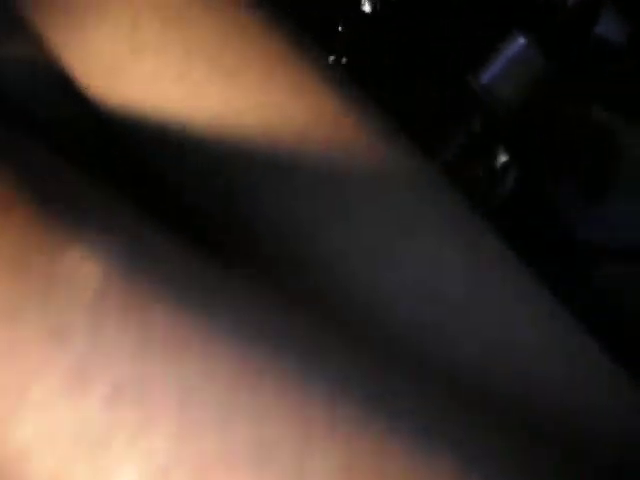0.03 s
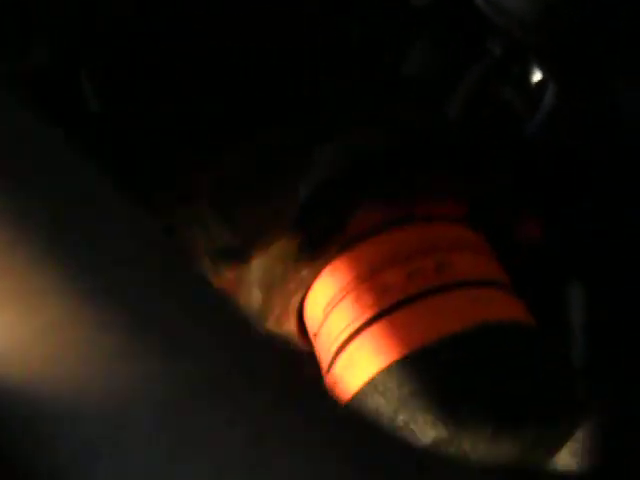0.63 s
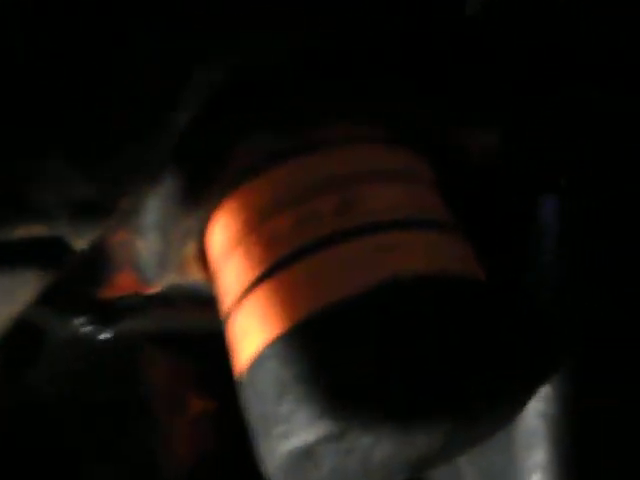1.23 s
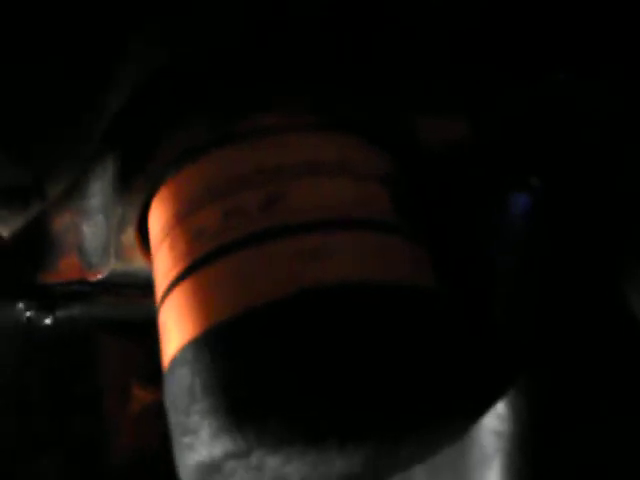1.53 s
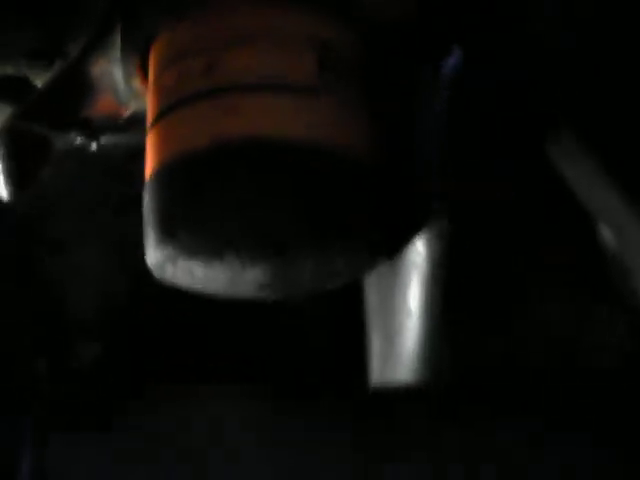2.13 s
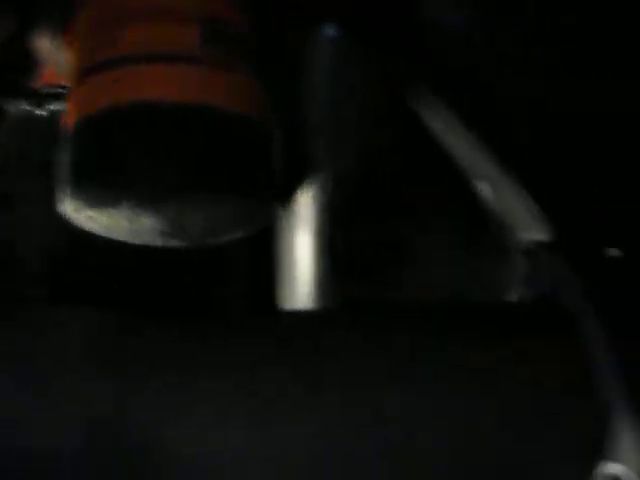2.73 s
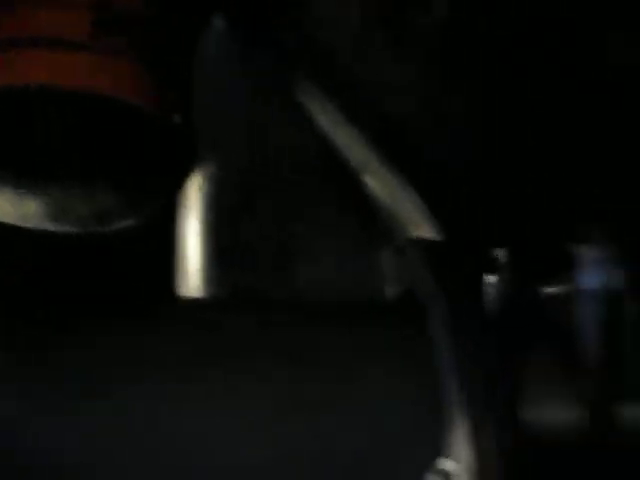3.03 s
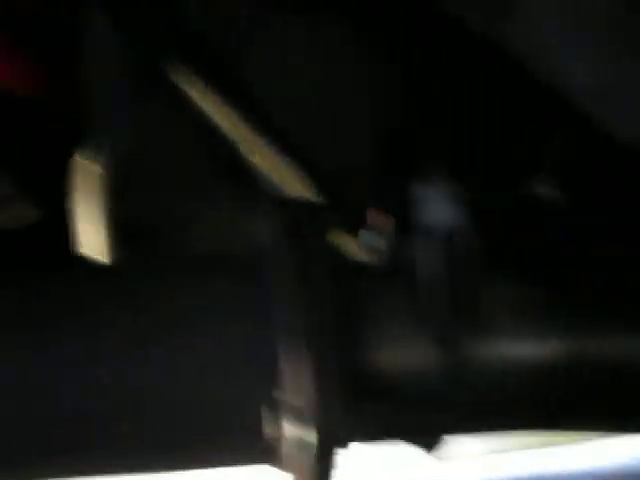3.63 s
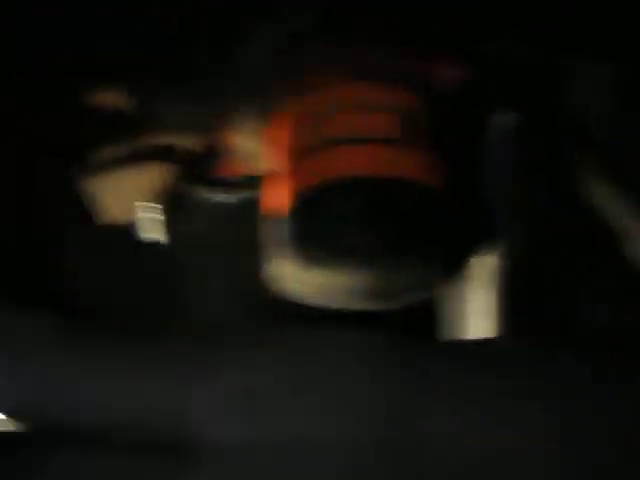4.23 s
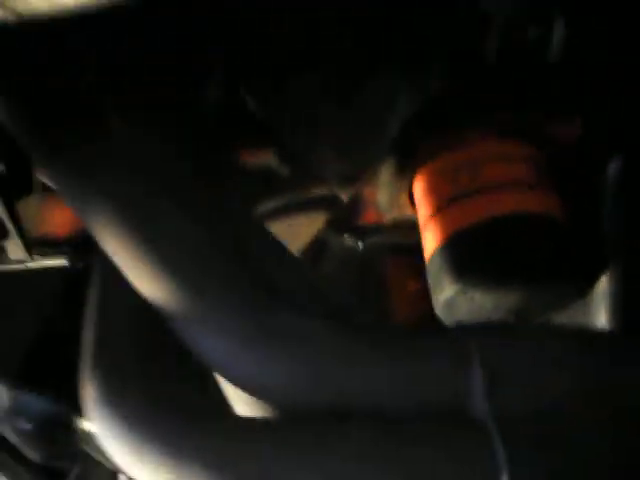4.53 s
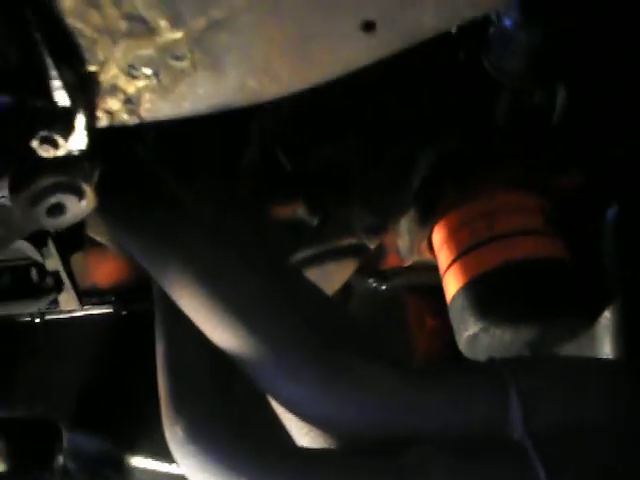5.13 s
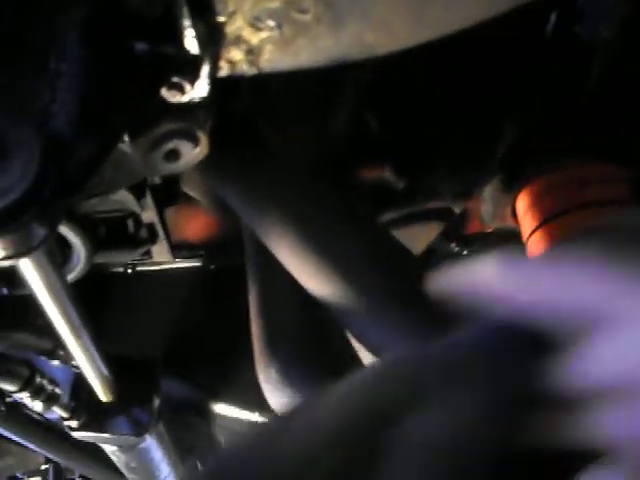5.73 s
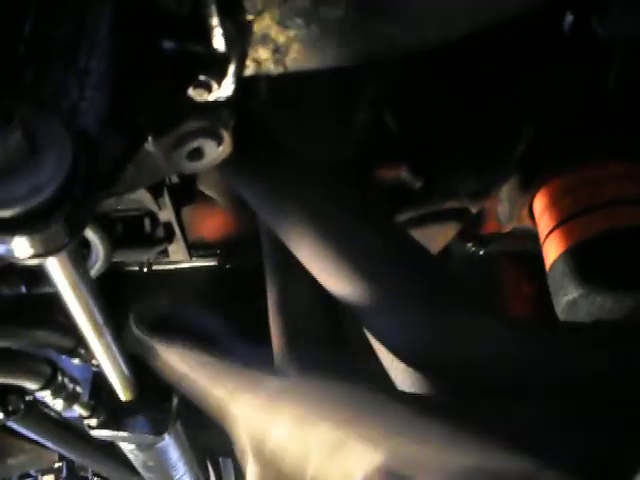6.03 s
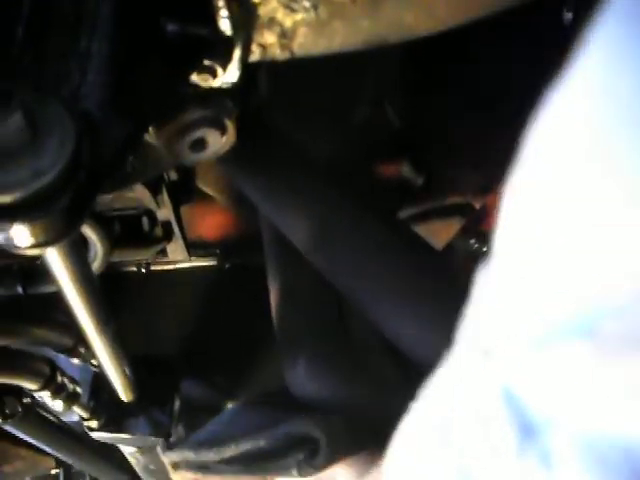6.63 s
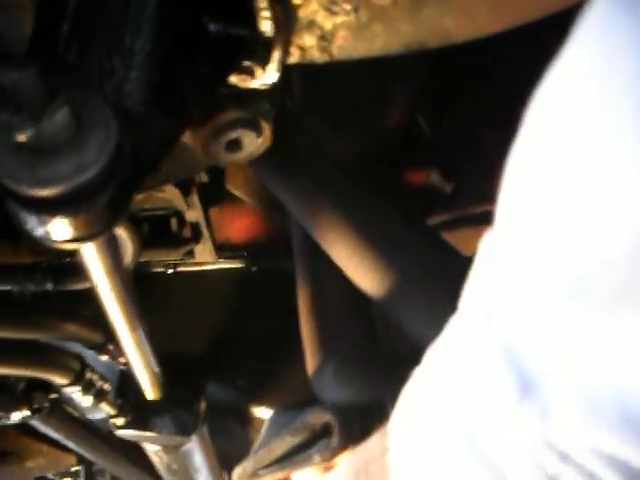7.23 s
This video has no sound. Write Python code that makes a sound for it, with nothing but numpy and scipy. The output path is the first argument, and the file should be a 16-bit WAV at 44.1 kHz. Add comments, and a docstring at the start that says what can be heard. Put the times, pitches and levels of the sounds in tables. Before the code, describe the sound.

An eight-cylinder car engine idles from start to finish, heard close up from just below. Uneven exhaust pulses make a deep, loping throb over the rumble of the block, with the biggest bass beats slightly squashed. On top, a slack valve lifter gives a loud, ringing metallic tick about seven times a second, and the other valves patter softly in between. Belts and fan add a steady rush and hiss, with thin, wavering pulley whines.

The ticking grows louder over the first two seconds and stays strong until about 4 seconds, changing tone a little around 3 seconds as the microphone swings toward a pipe. A faint, brief belt squeak comes at about 4.3 seconds. Between 4 and 5 seconds the microphone pulls back, so the ticking and hiss become softer, while the low throb continues steadily to the end at around 7.4 seconds.

```python
"""A loud, steady tick over the loping throb of an idling eight-cylinder engine, heard from just below it.
Once a cycle a slack valve lifter clacks through the metal block, while the other valves patter softly.
Uneven exhaust pulses make the throb; the block rumbles, and belts, fan and pulleys rush and whine.
The microphone swings from the oil filter to a pipe and back, then pulls away after about four seconds.
Its input squashes the biggest bass beats."""
import sys
import numpy as np
from scipy import signal
from scipy.fft import rfft, irfft, next_fast_len
from scipy.io import wavfile
from scipy.ndimage import map_coordinates

SR = 44100
rng = np.random.default_rng(int(sys.argv[2]) if len(sys.argv) > 2 else 0)


def master_out(mix):
    """Clip the mix to full scale and print it as 16-bit PCM to the path in sys.argv[1]."""
    frames = np.transpose(np.atleast_2d(mix))
    ceiling = np.clip(frames, -1, 1)
    pcm = np.round(ceiling * 32767).astype(np.int16)
    wavfile.write(sys.argv[1], SR, pcm)


N = 325458
TIME = np.arange(N) / SR


def amp(db):
    """Turn decibels into a number to multiply by."""
    return 10 ** (np.asarray(db) / 20)

def unit(x):
    """Scale a sound to an average (rms) level of 1."""
    return x / np.sqrt(np.mean(x ** 2) + 1e-20)

def along(points, hz):
    """Read a (frequency, value) table between its rows, on a log frequency scale."""
    freqs, values = np.transpose(points)
    return np.interp(np.log(hz + 1), np.log(freqs + 1), values)

def curves(rows, at):
    """Read a table that starts with a time column: one curve for each other column."""
    times, *columns = np.transpose(rows)
    return [np.interp(at, times, column) for column in columns]

def wobble(rate):
    """A smooth random curve through `rate` random points a second."""
    return map_coordinates(rng.standard_normal(int(N * rate / SR) + 4), [TIME * rate])

def filtered(x, response):
    """Turn each frequency up or down by response(hz)."""
    size = next_fast_len(N + 8192)
    return irfft(rfft(x, size) * response(np.fft.rfftfreq(size, 1 / SR)), size)[:N]

def noise(colour, ripple_db):
    """Noise with a given colour; nearby walls add fine, steady peaks and dips to it."""
    ripple = lambda hz: map_coordinates(rng.standard_normal(SR // 55), [hz / 55])  # a point every 55 Hz
    return unit(filtered(rng.standard_normal(N), lambda hz: amp(along(colour, hz) + ripple_db * ripple(hz))))

def drifting(count, size, alike):
    """Rows of noise; the closer `alike` is to 1, the more each row resembles the one before."""
    fresh = rng.standard_normal((count + 1, size))
    return signal.lfilter([np.sqrt(1 - alike ** 2)], [1, -alike], fresh[1:], axis=0, zi=alike * fresh[:1])[0]

# The idle speed wanders a little: (time [s], crankshaft speed [rpm])
IDLE_SPEED = [(0.0, 836.3), (0.57, 799.5), (0.75, 821.8), (3.08, 818.4), (3.5, 810.3), (4.6, 827.1),
              (4.78, 821.3), (6.14, 808.4), (7.38, 834.0)]
def camshaft():
    """Count engine cycles from the first loud tick: one for every two turns of the crankshaft."""
    rpm, = curves(IDLE_SPEED, TIME)
    turn = np.cumsum(rpm / 60 / 2) / SR
    return turn - turn[round(.044 * SR)]  # first tick at 0.044 s

def passes(turn, place):
    """The times at which the camshaft passes one place (0-1) in its cycle."""
    marks = np.arange(np.ceil(turn[0] - place), turn[-1] - place) + place
    return np.interp(marks, turn, TIME)

# When the microphone pulls away: (start [s], end [s])
RETREAT = [4.14, 4.75]
def backed_off(at):
    """0 while the microphone is beside the oil filter, 1 once it has pulled away."""
    return np.interp(at, RETREAT, [0, 1])

# Where the microphone points: (time [s], swing towards the pipe [0-1])
AIM = [(2.55, 0.02), (3.2, 1), (3.9, 0.9), (4.5, 0.2)]
def swung(at):
    """0 when the microphone faces the oil filter, 1 when it faces the pipe."""
    return curves(AIM, at)[0]

def swell(at, length_s, hz, width_hz, db):
    """A band of noise that fades in and out around one moment."""
    band = unit(filtered(rng.standard_normal(N), lambda f: np.exp(-((f - hz) / width_hz) ** 2)))
    return amp(db) * band * np.exp(-((TIME - at) / length_s) ** 2)

def squeak(at, length_s, hz, db):
    """A brief, slightly wavering tone that fades in and out."""
    fade = np.exp(-((TIME - at) / length_s) ** 2)
    return amp(db) * fade * np.sin(2 * np.pi * hz * TIME + 0.9 * wobble(46))

def passing_sounds():
    """A soft boom, two brief notes from the belt, a stray click and a squeak."""
    boom = swell(0.62, 0.077, hz=100, width_hz=12, db=-25.5)
    high_note = swell(2.4, 0.52, hz=2090, width_hz=100, db=-55)
    low_note = swell(4.13, .15, hz=473, width_hz=30, db=-48.5)
    click = swell(3.3025, .0006, hz=5500, width_hz=4000, db=-28)
    return boom + high_note + low_note + click + squeak(4.27, 0.059, hz=963, db=-45)

# Tones of the pulleys and housings: (pitch [Hz], width [Hz], level [dB])
PULLEY_TONES = [(461.5, 25, -62), (529.3, 28, -59), (702, 25, -59.5), (959, 16, -61.5), (1745, 35, -60.5)]
def whines():
    """Pulleys and housings give thin, wavering tones that swell and fade."""
    out = np.zeros(N)
    for hz, width, db in PULLEY_TONES:
        phase = 2 * np.pi * hz * TIME
        waver = wobble(width) * np.cos(phase) + wobble(width) * np.sin(phase)
        out += amp(db + 1.3 * wobble(2.34)) * unit(waver)
    return out

# Colour of the belt noise, close up and from further back: (frequency [Hz], relative level [dB])
BELT_NEAR_COLOUR = [(250, -42), (380, -2.5), (560, 0), (660, -2.5), (790, -0.5), (900, -5.5), (1130, -4),
                    (1400, -9), (1650, -17), (2300, -36)]
BELT_FAR_COLOUR = [(250, -25), (380, -1.5), (560, 1), (760, -5), (890, -9.5), (1050, -10), (1150, -6.5),
                   (1400, -7), (1650, -10), (2300, -38)]
def belts(firing, far):
    """The running belts rush and pulse a little with each firing; distance changes their colour."""
    close = np.cos(np.pi / 2 * far) * noise(BELT_NEAR_COLOUR, ripple_db=2)
    distant = np.sin(np.pi / 2 * far) * noise(BELT_FAR_COLOUR, ripple_db=2)
    flutter_db = .5 * firing + 0.73 * wobble(30) + 0.31 * wobble(6.4)
    return amp(flutter_db) * (close + distant)

# Colour of the fan's hiss: (frequency [Hz], relative level [dB])
FAN_COLOUR = [(880, -31), (1500, -2), (1740, -2), (1880, 2), (2450, 2.5), (3630, -0.5), (3920, 2.5),
              (4500, -1), (5260, 1), (6130, -0.5), (8720, -1), (9920, -3), (10400, -8.5), (11200, -34),
              (11700, -27), (15200, -57), (22000, -120)]
def fan():
    """The fan pushes air in a bright, nearly even hiss."""
    return amp(0.39 * wobble(40)) * noise(FAN_COLOUR, ripple_db=3.5)

# Colour of the block's rumble: (frequency [Hz], relative level [dB])
RUMBLE_COLOUR = [(18, -2), (30, -7), (55, 14), (100, 9.5), (150, 8.5), (175, -1), (203, 3.5), (232, -2.5),
                 (262, -2), (300, .5), (360, -6), (420, -17), (600, -53)]
def block_rumble(turn, firing):
    """Each firing shakes the engine block; one cylinder thuds harder than the rest."""
    thud = np.exp(14 * (np.cos(2 * np.pi * (turn - .84)) - 1))
    return amp(1.5 * firing + 3.5 * thud) * noise(RUMBLE_COLOUR, ripple_db=-1.5)

# How the background's relative levels move: (time [s], rumble [dB], belts [dB], fan [dB])
BACKGROUND_LEVELS = [(0.12, -39.5, -43, -39), (2.84, -39.5, -43.5, -38.5), (6.57, -38, -48, -43),
                     (7.25, -38.5, -46, -43.5)]
def background(turn):
    """Mix rumble, belts, fan and whines; facing the pipe, reflections hollow out the belts and fan."""
    rumble_db, belt_db, fan_db = curves(BACKGROUND_LEVELS, TIME)
    firing = np.cos(2 * np.pi * (8 * turn - .9))  # eight beats a cycle
    rumble = amp(rumble_db + 5) * block_rumble(turn, firing)
    air = amp(belt_db - 1) * belts(firing, backed_off(TIME)) + amp(fan_db - 2) * fan()
    hollow_band = filtered(air, lambda hz: np.exp(-((hz - 1380) / 230) ** 2))
    air -= .5 * swung(TIME) * hollow_band
    whine = amp(0.59 * (belt_db - belt_db.mean())) * whines()  # partly follows the belts' level
    return rumble + air + whine

# Exhaust pulses, arriving through pipes of unequal length: (place in the cycle [0-1], strength [0-1])
EXHAUST_PULSES = [(0.104, 0.65), (0.212, 0.56), (0.322, 0.91), (0.431, 0.44), (0.584, 0.24), (0.691, 0.45),
                  (0.851, 0.46), (0.922, 0.3)]
# The tones that make up the exhaust note: (pitch [multiples of the cycle rate], level [dB])
EXHAUST_TONES = [(5, -45.7), (8, -21.7), (9, -35.7), (10, -32.3), (11, -44.7), (12, -46.7), (13, -24.3),
                 (14, -28.3), (15, -37.3), (16, -38.4), (18, -42.0), (19, -48.9), (20, -53.4), (21, -36.2),
                 (22, -43.5), (23, -54.2), (24, -52.7), (30, -54.0), (39, -54.7)]
# The exhaust is louder when the microphone is nearer: (time [s], level change [dB])
EXHAUST_NEARNESS = [(0, 0.15), (2.5, 0.68), (4.3, 0.36), (5.2, -0.6), (6.3, -1.5), (7.38, 0.2)]
def exhaust(turn):
    """Eight uneven firings a cycle; the tones peak together on the heavy ones, so the idle lopes."""
    place, strength = np.transpose(EXHAUST_PULSES)
    unsteady_turn = turn + 0.0012 * wobble(17)
    note = np.zeros(N)
    for multiple, db in EXHAUST_TONES:
        phase = np.angle(np.sum(strength * np.exp(-2j * np.pi * multiple * place)))
        note += np.sqrt(2) * amp(db) * np.cos(2 * np.pi * multiple * unsteady_turn + phase)
    near_db, = curves(EXHAUST_NEARNESS, TIME)
    return note * amp(near_db + 0.4 * wobble(23))

# How long a knock lasts in the block at damping 1: (frequency [Hz], time to fade by 60 dB [s])
KNOCK_FADE = [(1500, 0.12), (3600, .11), (5500, 0.076), (9000, 0.063)]
def block_knocks(count, colour_db, alike, damping):
    """The block answers each blow with a burst of noise, much like the last; the treble dies first."""
    hz, age, spectra = signal.stft(drifting(count, size=4096, alike=alike), SR, nperseg=128)
    colour = unit(amp(colour_db(hz)))
    fade = np.exp(-np.log(1000) * damping * age / along(KNOCK_FADE, hz)[:, None])
    return signal.istft(spectra * colour[..., None] * fade, SR, nperseg=128)[1]

# Ringing of the metal: (pitch [Hz], relative level near [dB], and far [dB], time to fade by 60 dB [s])
METAL_RINGS = [(2790, -19, -24, .12), (3090, -17.5, -21, .12), (3335, -18.5, -23, .12),
               (3830, -16, -20, .11), (5110, -21, -25, .1), (5375, -24, -15.5, .09), (6900, -24, -23, .08),
               (8413, -22, -25, .08)]
def clacks(times, level_db, colour_db, rise_s, ring_db, alike, damping):
    """Strike the block at the given times: each blow is a knock plus the ring of the metal."""
    blows = block_knocks(len(times), colour_db, alike, damping)
    age = np.arange(blows.shape[1]) / SR
    far = backed_off(times)[:, None]
    stand_out_db = 1.5 + 4.5 * far  # the ring stands out more from further back
    for hz, near_db, far_db, fade_s in METAL_RINGS:
        db = near_db + far * (far_db - near_db) + 2 * drifting(len(times), size=1, alike=alike)
        ring = np.sin(2 * np.pi * (hz * age + rng.random())) * np.exp(-np.log(1000) * age / fade_s)
        blows += amp(ring_db + stand_out_db + db) * ring
    blows *= (1 - np.exp(-age / rise_s)) * amp(level_db)[:, None]
    samples = np.round(times * SR).astype(int)[:, None] + np.arange(len(age))
    heard = (samples >= 0) & (samples < N)
    return np.bincount(samples[heard], blows[heard], N)  # add each blow in at its own time

# How loud all the valves are: (time [s], relative level [dB])
VALVE_NEARNESS = [(0, -33.5), (1.7, -29.4), (2.3, -31), (3.3, -29), (4, -30), (4.75, -34.5), (6, -36.5),
                  (7.38, -37)]
def valve_level(at):
    """The valves grow louder as the microphone comes closer, and softer as it pulls away."""
    return curves(VALVE_NEARNESS, at)[0]

# The quieter valves: (place in the cycle [0-1], relative level [dB], rise time [s])
VALVE_TAPS = [(.215, -11.5, .003), (.285, -7.5, 0.0033), (.33, -12, 0.00058), (.575, -10.5, 0.0022),
              (.678, -9.5, .0005), (.708, -7.5, 0.0012), (.905, -5.5, 0.0068)]
# Colour of their taps: (frequency [Hz], relative level [dB])
TAP_COLOUR = [(500, -39), (1500, -6), (2500, -3.5), (3800, -1.5), (4600, -3.5), (7000, 1), (9500, 2.5),
              (10400, -7), (11000, -22), (11800, -26)]
def soft_valves(turn):
    """The other valves tap the block more softly and brightly, each at its own place in the cycle."""
    out = np.zeros(N)
    for place, db, rise_s in VALVE_TAPS:
        times = passes(turn, place)
        late, louder = rng.standard_normal((len(times), 2)).T
        level_db = valve_level(times) + db + 4.5 + 1.8 * louder
        out += clacks(times + .0005 * late, level_db, lambda hz: along(TAP_COLOUR, hz), rise_s,
                      ring_db=-8, alike=0.845, damping=1.16)
    return out

# Colour of the loud tick: (frequency [Hz], relative level [dB])
LIFTER_COLOUR = [(300, -41), (1500, -21), (1900, -9), (2400, -8), (3000, -1.5), (3850, 2), (4400, -5),
                 (5200, -2), (6200, -4), (8500, -3), (9600, -3.5), (10400, -8), (11000, -25),
                 (11700, -23.5)]
# How that colour changes with the microphone's place: (frequency [Hz], level change [dB])
TINT_AT_FILTER = [(2000, 1), (2900, 0.5), (4200, 0), (7000, 2)]
TINT_AT_PIPE = [(2000, 4), (2900, -5), (3900, 0), (5200, -1), (7000, -0.5)]
TINT_FAR_BACK = [(2000, 4), (2900, 0.5), (4200, 0.5), (7000, .5)]
def loud_lifter(turn):
    """One slack valve lifter snaps shut once a cycle; its colour depends on where the microphone is."""
    times = passes(turn, 0)
    level_db = valve_level(times) + 6 + 0.5 * rng.standard_normal(len(times))
    pipe, far = swung(times)[:, None], backed_off(times)[:, None]

    def colour_db(hz):
        near_tint = (1 - pipe) * along(TINT_AT_FILTER, hz) + pipe * along(TINT_AT_PIPE, hz)
        return along(LIFTER_COLOUR, hz) + (1 - far) * near_tint + far * along(TINT_FAR_BACK, hz)

    return clacks(times, level_db, colour_db, rise_s=0.0013, ring_db=-0.5, alike=0.862, damping=0.91)

def scene():
    """Add all the sounds into one channel; the camshaft keeps the engine's parts in step."""
    turn = camshaft()
    engine = exhaust(turn) + loud_lifter(turn) + soft_valves(turn) + background(turn)
    return (engine + passing_sounds())[None]

def record(dry):
    """The input rounds off the biggest beats, choking the hiss on them, and passes 10 Hz to 12.1 kHz."""
    ceiling, hardness = .285, 12
    squashed = dry[0] / (1 + np.abs(dry[0] / ceiling) ** hardness) ** (1 / hardness)
    return filtered(squashed, lambda hz: (hz > 10) & (hz < 12100))[None]


dry = scene()
out = record(dry)
master_out(out)
```